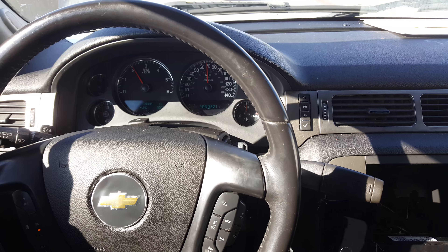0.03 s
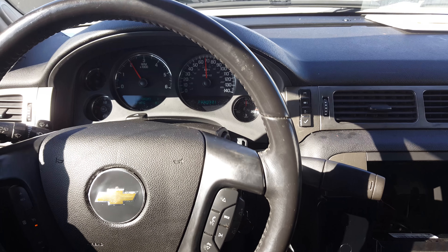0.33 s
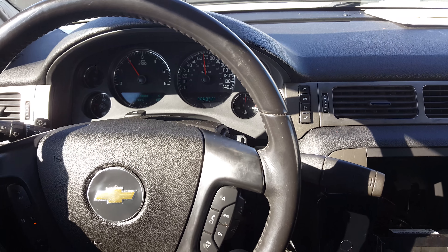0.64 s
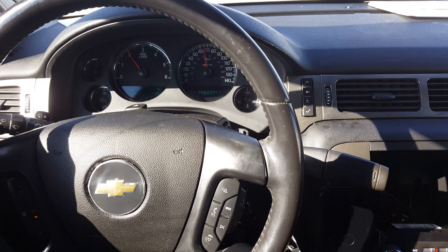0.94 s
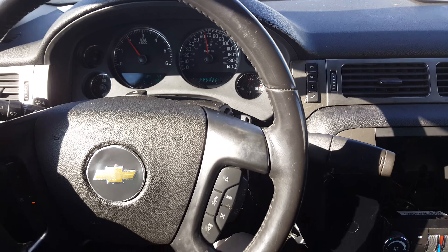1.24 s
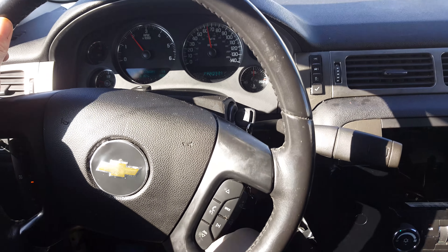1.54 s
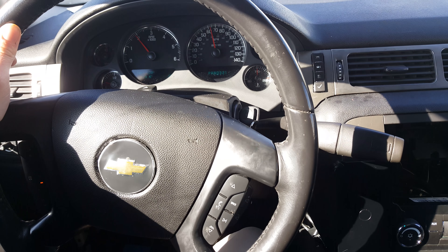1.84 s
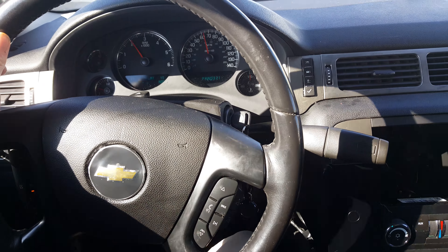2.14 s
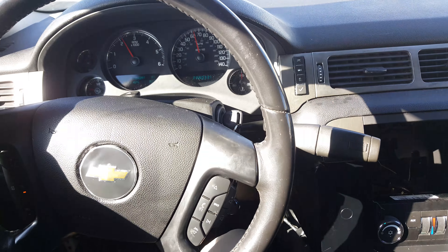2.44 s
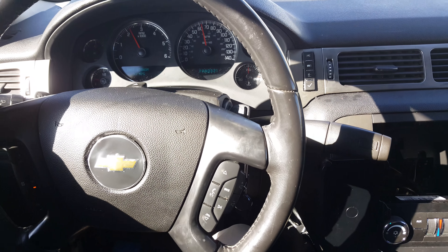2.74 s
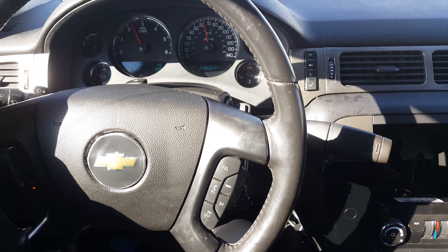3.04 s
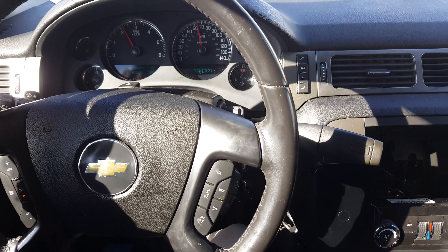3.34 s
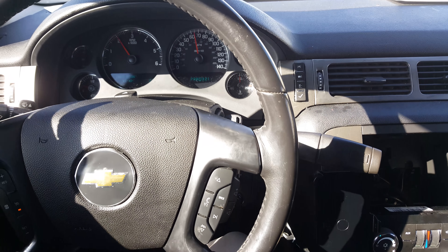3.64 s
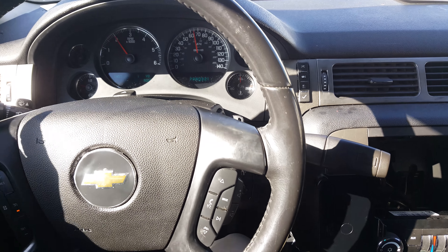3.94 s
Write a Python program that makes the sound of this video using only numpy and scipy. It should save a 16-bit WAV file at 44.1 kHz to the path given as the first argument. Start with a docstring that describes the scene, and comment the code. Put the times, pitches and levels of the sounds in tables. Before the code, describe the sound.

Rapid regular ticking over low road rumble inside a moving truck, later a loose rattle.

```python
"""Something hard ticks once per wheel turn, with weaker taps between, inside a truck at highway speed.
The ticking stops while the engine pulls and the axle whines, and returns as a loose rattle when the
throttle eases. Each knock is a burst of noise plus a few ringing tones, and loose trim buzzes along.
Behind it, road rumble, tyre hum and wind fill the cabin, and rough patches make the body boom.
The whole sound fades in at the start."""
import sys
import numpy as np
from scipy.fft import rfft, irfft, next_fast_len
from scipy.io import wavfile
from scipy.ndimage import map_coordinates

SR = 44100
rng = np.random.default_rng(int(sys.argv[2]) if len(sys.argv) > 2 else 0)


def log_audio(samples):
    """Write samples as a 16-bit WAV file to the path given in sys.argv[1]."""
    # one column per channel
    frames = np.atleast_2d(samples).T
    # limit to full scale, then quantise
    limited = np.clip(frames, -1, 1)
    pcm = np.round(limited * 32767).astype(np.int16)
    wavfile.write(sys.argv[1], SR, pcm)


N = 176400  # 4 seconds

# Levels in dB are relative: the functions add gains on top. A "colour" is a sound's low-to-high balance.
# How alike the ears hear noise. Each row: pitch in Hz, likeness (1 the same, -1 opposite).
EAR_LIKENESS = [(100, 0.95), (350, 0.87), (450, 0.63), (750, 0.37), (930, .3), (1080, -0.64), (1400, -.4),
                (1900, -0.26), (2400, 0.47), (3400, -0.19), (4500, 0.066), (7000, -0.013)]
# Which side is louder. Each row: pitch in Hz, left minus right in dB.
EAR_BALANCE = [(100, 0.3), (155, 3.5), (250, 0.5), (800, -0.5), (1100, 2), (1600, -0.5), (3100, 1),
               (4300, -4.5), (6000, -4), (9000, -2.5), (14000, -1.5)]
# Road noise. Each row: time in seconds, rumble level in dB, roar level in dB.
ROAD_LEVELS = [(.42, -20, -35), (.62, -22, -33), (1.1, -22.5, -33.5), (1.3, -20, -34), (1.6, -23.5, -33.5),
               (2.1, -22.5, -34), (2.55, -21.5, -34), (3.15, -23, -33.5), (3.65, -24.5, -34),
               (3.85, -20, -34), (4, -28.5, -32.5)]
# Rough patches under the tyres. Each row: start in seconds, level in dB.
ROUGH_PATCHES = [(1.19, -25.5), (1.325, -15), (2.24, -24)]
# The colour of each noise. Each row: pitch in Hz, strength at that pitch in dB.
RUMBLE_COLOUR = [(15, -19), (30, -8.5), (55, -6), (72, -6), (92, -1), (125, 1.5), (155, -5.5), (185, -11),
                 (240, -7), (290, -11), (360, -13), (470, -27), (800, -59.5), (2500, -120)]
ROAR_COLOUR = [(60, -48), (200, -28.5), (420, -0.5), (620, -2.5), (780, 0.5), (970, -4.5), (1100, 0.5),
               (1400, -6), (1900, -12.5), (2600, -18), (3300, -26), (4500, -39.5), (7000, -65.5),
               (11000, -120)]
HISS_COLOUR = [(1500, -15.5), (2700, 8), (4200, 5), (5300, -6.5), (7200, -10.5), (8800, -8.5),
               (10200, -18.5), (15500, -16)]
BOOM_COLOUR = [(15, -17), (40, -4.5), (62, -5.5), (88, 1), (130, -7.5), (170, -14), (240, -16), (400, -37),
               (1500, -120)]
TRIM_COLOUR = [(900, -15), (2300, 6.5), (3300, 3), (4400, -1), (5800, -6.5), (7200, -11), (8700, -8.5),
               (10500, -21), (13000, -21.5), (15500, -19)]
THIN_TAP_COLOUR = [(1500, -20), (4500, -5), (8000, 0), (10500, -3), (14000, 8), (16000, 4)]
KNOCK_COLOUR = [(300, -37), (900, -0.5), (1500, 10), (2000, 0.5), (2700, 5), (3400, -6.5), (4400, -6.5),
                (5600, -10), (7200, -16), (8700, -11), (10500, -25), (12300, -20), (15500, -31)]
# Wheel speed. Each row: time in seconds, turns per second.
WHEEL_SPEED = [(.4, 12.7), (1.0, 12.6), (1.7, 12.22), (2.1, 12.37), (2.8, 12.62), (3.3, 12.65), (4, 12.6)]
# The engine's pull. Each row: time in seconds, firings per second, level in dB.
ENGINE_PULL = [(.4, 142.2, -33.5), (1.7, 138.8, -29), (2.0, 144.3, -26), (2.3, 151, -27.5),
               (2.8, 154.7, -23.5), (3.1, 151.1, -27.5), (3.3, 143, -43), (4, 140.9, -30.5)]
# Tyre and engine tones. Each row: multiple of the wheel or firing rate, level in dB.
TYRE_TONES = [(4, -40.5), (7, -41.5), (8, -33.5), (9, -32), (11, -36), (18, -37)]
ENGINE_TONES = [(1, -2), (2, -13), (3, -23.5), (4, -28)]
# How tyre hum, axle whine and trim buzz swell and fade. Each row: time in seconds, level in dB.
TYRE_LEVELS = [(.5, -4.5), (1.2, 1), (1.7, 3), (2.7, 3), (3.3, -2), (4, -7)]
AXLE_LEVELS = [(1.5, -67), (1.9, -39), (2.15, -39.5), (2.45, -43), (2.8, -43.5), (3.3, -53.5)]
TRIM_LEVELS = [(.5, -46.5), (.7, -49.5), (1.0, -51), (1.25, -52), (1.39, -48), (1.47, -53.5), (1.62, -66),
               (2.7, -81.5), (2.88, -61.5), (3.0, -64), (3.15, -71.5), (3.37, -54), (3.44, -66.5),
               (3.7, -58), (3.85, -51.5), (4, -46)]
# The hard part's ringing tones. Each row: pitch in Hz, level in dB, seconds to fade by 60 dB.
PART_TONES = [(1480, -2, 0.017), (1880, -2, 0.08), (2703, 2, .05), (2790, -7, 0.037), (3870, -10.5, 0.034),
              (4233, -1.5, 0.076), (4600, -10.5, .05), (4900, -13, .05), (5860, -16.5, .05),
              (6600, -16.5, 0.065), (8350, -17, .05), (8870, -14, 0.055)]
# Ticks, one per wheel turn, and thin high taps. Each row: start in seconds, level in dB.
WHEEL_TICKS = [(0.4395, -36.5), (0.5176, -36), (0.5936, -36.5), (0.6668, -41.5), (0.7521, -32),
               (0.833, -32), (0.9108, -33), (0.9894, -33.5), (1.0694, -35.5), (1.1488, -33), (1.2275, -33),
               (1.309, -39.5), (1.3826, -42.5)]
THIN_TAPS = [(.558, -64.5), (.635, -64), (.716, -63), (.797, -59), (.875, -58), (.955, -57), (1.035, -63),
             (1.117, -50), (1.278, -54), (1.36, -45), (1.433, -49), (1.521, -52.5), (1.729, -60),
             (3.863, -51), (3.945, -44.5)]
# The loose rattle. Each row: start in seconds, level in dB, treble tilt in dB per octave.
RATTLE_KNOCKS = [(0.684, -44, 2.5), (0.796, -34, -2), (.877, -46.5, 0), (1.194, -48, 1), (1.737, -51.5, 3),
                 (3.064, -52.5, 2), (3.332, -52, 0.5), (3.662, -49.5, -1.5), (3.711, -45.5, -2.5),
                 (3.746, -43.5, -3.5), (3.7728, -37.5, 0), (3.8019, -42.5, 1), (3.823, -32.5, -3),
                 (3.877, -29.5, -2), (3.889, -33, -4), (3.902, -39, 0.5), (3.968, -34, 0.5),
                 (3.986, -35, -0.5)]

RUMBLE_DB, ROAR_DB, HISS_DB = -1.5, 2, -58
TICK_BOOST_DB, RATTLE_BOOST_DB, RING_DB = 3.5, 2.5, -13.5
BOUNCE_S, BOUNCE_DB = 0.0031, -1.5  # a tick's second contact: rough delay, level change
CRACK_FADE_S, ECHO_FADE_S, ECHO_DB = 0.018, 0.086, -3  # each fade falls by 60 dB
AXLE_TEETH = 41


def amp(db):
    """Turn decibels into a number to multiply by."""
    return 10 ** (np.asarray(db) / 20)


def at_pitch(table, hz):
    """Read between a table's rows, on a musical (log) pitch scale."""
    pitches, values = np.transpose(table)
    return np.interp(np.log(hz + 1), np.log(pitches + 1), values)


def curves(table):
    """Stretch each column after the time into one value per sample."""
    times, *columns = np.transpose(table)
    return [np.interp(np.arange(N) / SR, times, column) for column in columns]


def wobble(rate):
    """A smooth curve through `rate` random values a second."""
    return map_coordinates(rng.standard_normal(2048), [np.arange(N) * rate / SR], mode="wrap")


def filtered(sound, gain_at):
    """Turn each pitch up or down by gain_at(hz)."""
    length = sound.shape[-1]
    padded = next_fast_len(length + 8192)
    hz = np.fft.rfftfreq(padded, 1 / SR)
    return irfft(rfft(sound, padded) * gain_at(hz), padded)[..., :length]


def noise(colour, size=N):
    """Stereo noise of strength 1, as alike in both ears as the cabin makes it."""
    def gain_at(hz):
        spread = np.arccos(np.clip(at_pitch(EAR_LIKENESS, hz), -1, 1)) / 2
        return amp(at_pitch(colour, hz)) * [np.cos(spread), np.sin(spread)]

    shared, opposite = filtered(rng.standard_normal((2, size)), gain_at)
    ears = np.array([shared + opposite, shared - opposite])
    return ears / np.sqrt(np.mean(ears ** 2) + 1e-20)


def hum(rate, tones, drift, waver_db):
    """Tones at multiples of a rate, a little unsteady in level and phase (drift, in radians)."""
    angle = 2 * np.pi * np.cumsum(rate) / SR
    out = np.zeros(N)
    for multiple, db in tones:
        level = np.sqrt(2) * amp(db + waver_db * wobble(7))
        out += level * np.sin(multiple * angle + rng.uniform(0, 2 * np.pi) + drift * wobble(6))
    return out


def add(track, start_s, sound):
    """Mix a short sound into the track."""
    part = track[:, round(start_s * SR):][:, :sound.shape[-1]]
    part += sound[..., :part.shape[-1]]


def road():
    """The truck's body rumbles, tyres and wind roar, and a thin hiss sits on top."""
    rumble_db, roar_db = curves(ROAD_LEVELS)
    rumble = amp(rumble_db + RUMBLE_DB + 1.15 * wobble(14)) * noise(RUMBLE_COLOUR)
    roar = amp(roar_db + ROAR_DB + 0.89 * wobble(40)) * noise(ROAR_COLOUR)
    hiss = amp(HISS_DB + 0.8 * wobble(25)) * noise(HISS_COLOUR)
    return rumble + roar + hiss


def bumps(rise_s=0.034):
    """Each rough patch of road sets the body booming briefly."""
    out = np.zeros((2, N))
    age = np.arange(SR // 2) / SR / rise_s
    swell = age * np.exp(1 - age)
    for start, db in ROUGH_PATCHES:
        add(out, start, amp(db) * swell * noise(BOOM_COLOUR, len(swell)))
    return out


def tyre_hum(wheel_rate):
    """The rolling tyres hum at multiples of the wheel rate."""
    level_db, = curves(TYRE_LEVELS)
    return amp(level_db) * hum(wheel_rate, TYRE_TONES, drift=0.66, waver_db=2.0)


def engine_drone():
    """The engine's firings blend into a drone that grows as it pulls."""
    firing_hz, level_db = curves(ENGINE_PULL)
    return amp(level_db) * hum(firing_hz, ENGINE_TONES, drift=0.75, waver_db=2.5)


def axle_whine(wheel_rate):
    """The axle's gear teeth meet many times per wheel turn, making one tone."""
    level_db, = curves(AXLE_LEVELS)
    return amp(level_db) * hum(wheel_rate, [(AXLE_TEETH, 0)], drift=0.4, waver_db=0.7)


def trim_buzz(flutter_db=1.0):
    """Loose trim buzzes in a fine, fluttering fizz."""
    level_db, = curves(TRIM_LEVELS)
    return amp(level_db + flutter_db * wobble(64)) * noise(TRIM_COLOUR)


def click(colour, rise_s=1e-5):
    """A crack of noise and its short echo in the cabin."""
    t = np.arange(SR // 6) / SR
    rise = np.minimum(t / rise_s, 1)
    crack = amp(-60 * t / CRACK_FADE_S)
    echo = amp(ECHO_DB - 60 * t / ECHO_FADE_S)
    return rise * np.hypot(crack, echo) * noise(colour, len(t))


def knock(tilt_db=0):
    """The hard part hits once, clicks and rings. A tilt above 0 makes it brighter."""
    tilt = lambda hz: tilt_db * np.log2(hz / 3000)  # no change at 3000 Hz
    crack = click([(hz, db + tilt(hz)) for hz, db in KNOCK_COLOUR])
    t = np.arange(crack.shape[1]) / SR
    ring = np.zeros_like(crack)
    for hz, db, fade_s in PART_TONES:
        level = amp(db + tilt(hz) + rng.normal(0, 1.9) - 60 * t / fade_s)
        pitch = hz * rng.normal(1, 0.0022)  # no two hits ring quite alike
        ear_phase = rng.random((2, 1))
        ring += level * np.sin(2 * np.pi * (pitch * t + ear_phase))
    return crack + amp(RING_DB) * ring


def ticking():
    """The hard part hits twice per tick and once per rattle knock, with thin taps between."""
    out = np.zeros((2, N))
    for start, db in WHEEL_TICKS:
        add(out, start, amp(db + TICK_BOOST_DB) * knock())
        bounce_start = start + BOUNCE_S * rng.uniform(0.7, 1.5)
        add(out, bounce_start, amp(db + TICK_BOOST_DB + BOUNCE_DB) * knock())
    for start, db, tilt_db in RATTLE_KNOCKS:
        add(out, start, amp(db + RATTLE_BOOST_DB) * knock(tilt_db))
    for start, db in THIN_TAPS:
        add(out, start, amp(db) * click(THIN_TAP_COLOUR, rise_s=0.003))
    return out


def scene():
    """All the sounds together, as heard from the driver's seat."""
    wheel_rate, = curves(WHEEL_SPEED)
    background = road() + bumps() + tyre_hum(wheel_rate) + engine_drone() + axle_whine(wheel_rate)
    cabin = background + ticking() + trim_buzz()
    ear_share = np.array([[0.5], [-0.5]])  # half added on the left, half taken from the right
    return filtered(cabin, lambda hz: amp(at_pitch(EAR_BALANCE, hz) * ear_share))


def record(dry):
    """Fade the sound in over a very faint low noise, and cut the highest treble."""
    fade_start_s, fade_s, floor_db, top_hz = 0.37, 0.25, -101.5, 15830
    fade_in = np.clip((np.arange(N) / SR - fade_start_s) / fade_s, 0, 1) ** 0.91
    floor = amp(floor_db) * noise([(20, -9), (100, -14), (400, -25), (3000, -65)])
    return filtered(dry * fade_in + floor, lambda hz: hz < top_hz)


dry = scene()
out = record(dry)
log_audio(out)
```